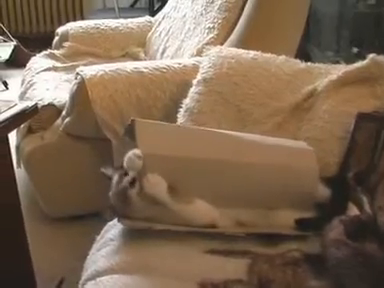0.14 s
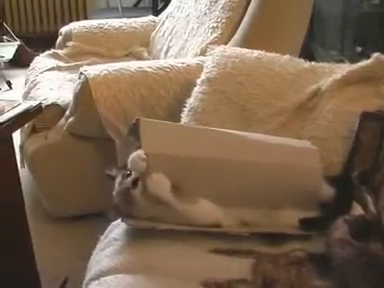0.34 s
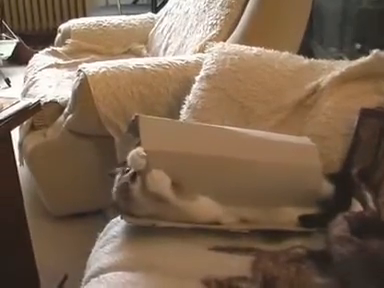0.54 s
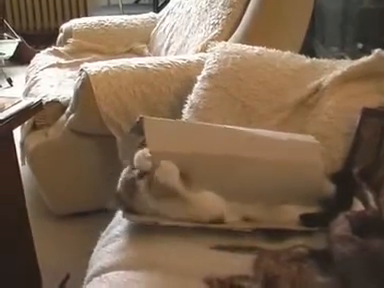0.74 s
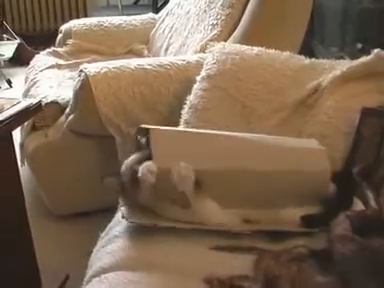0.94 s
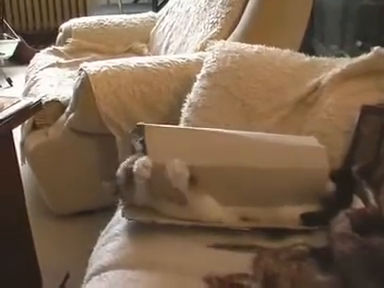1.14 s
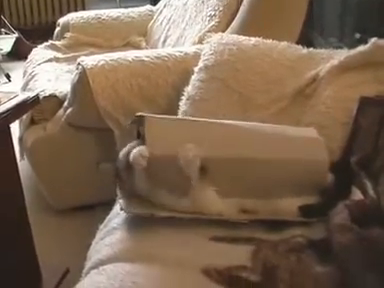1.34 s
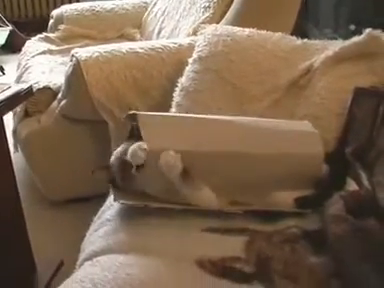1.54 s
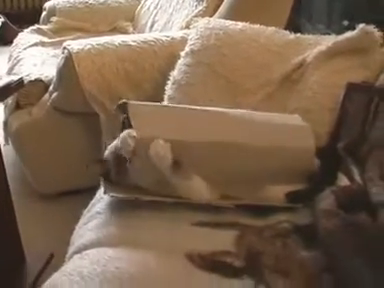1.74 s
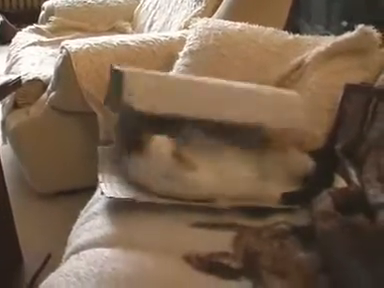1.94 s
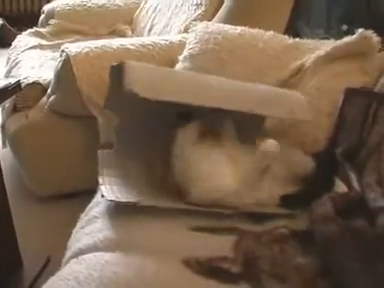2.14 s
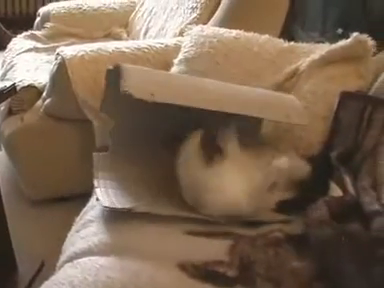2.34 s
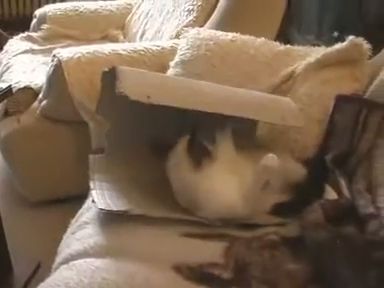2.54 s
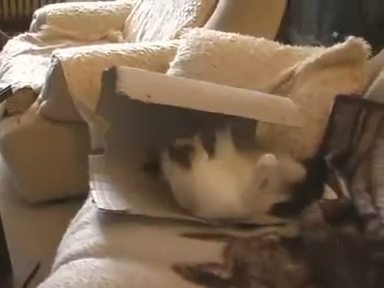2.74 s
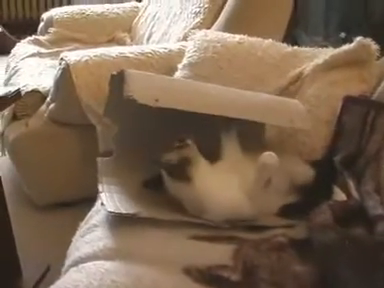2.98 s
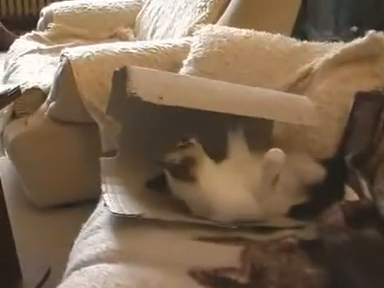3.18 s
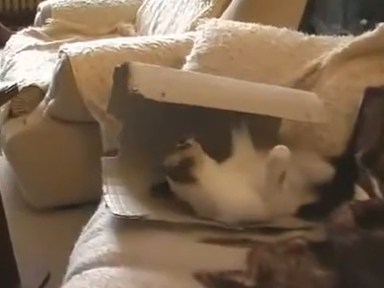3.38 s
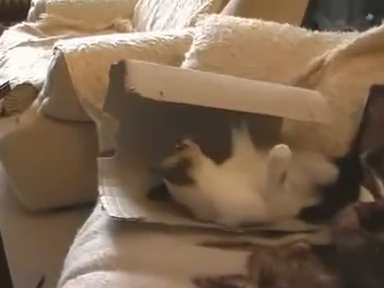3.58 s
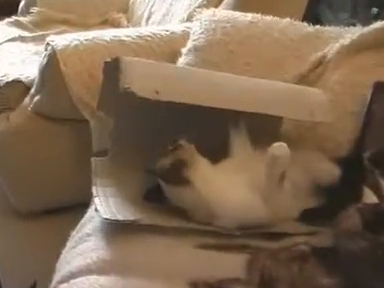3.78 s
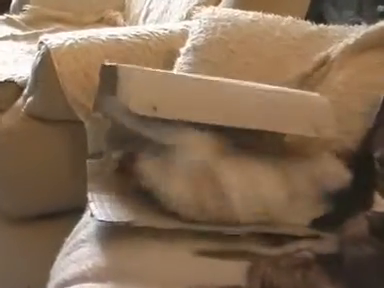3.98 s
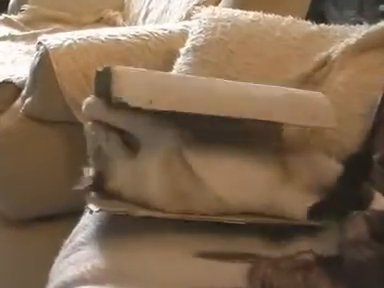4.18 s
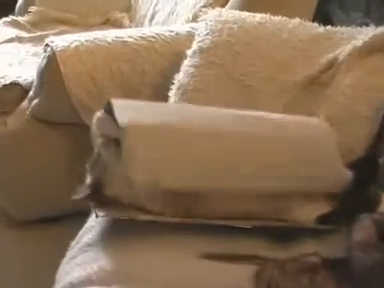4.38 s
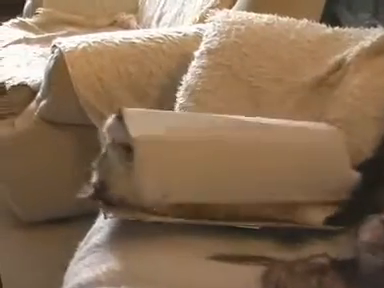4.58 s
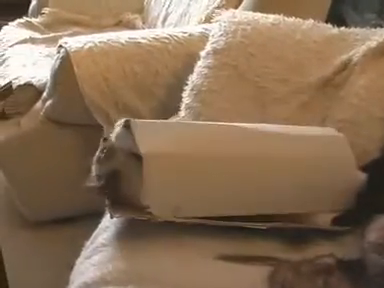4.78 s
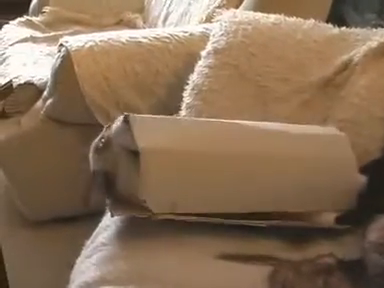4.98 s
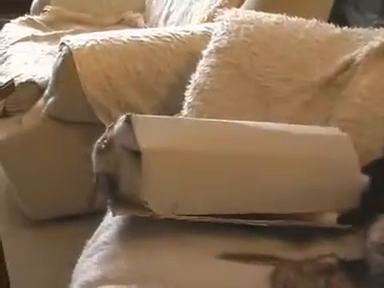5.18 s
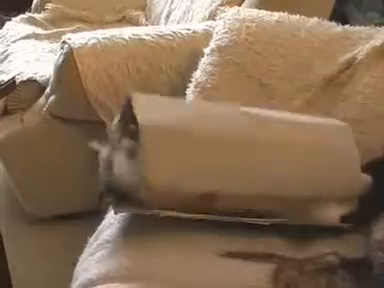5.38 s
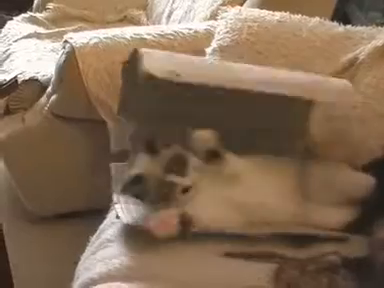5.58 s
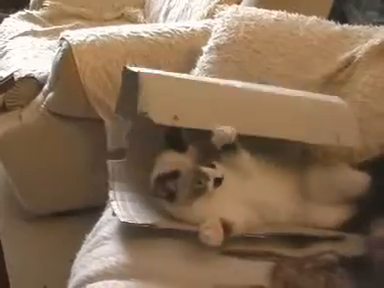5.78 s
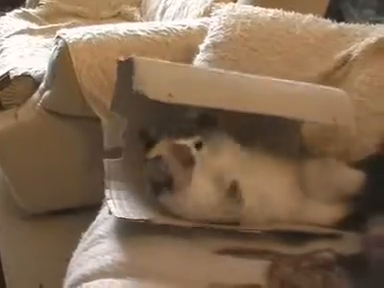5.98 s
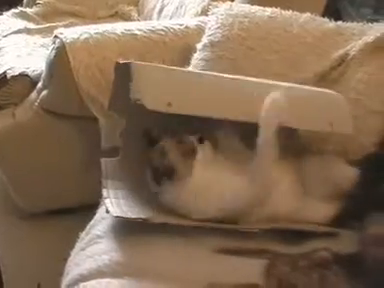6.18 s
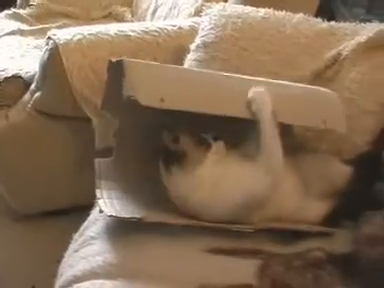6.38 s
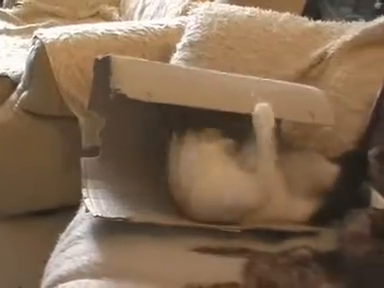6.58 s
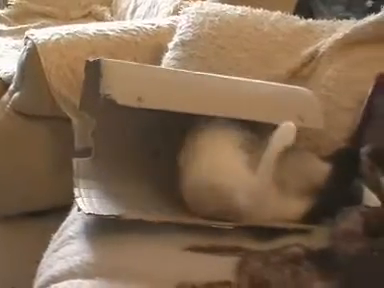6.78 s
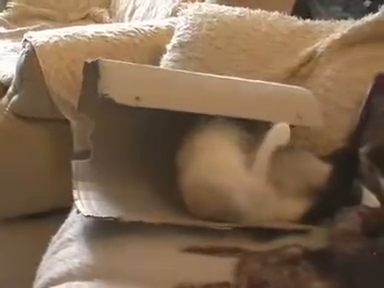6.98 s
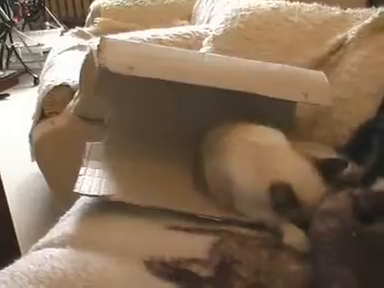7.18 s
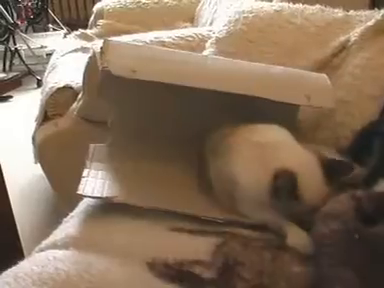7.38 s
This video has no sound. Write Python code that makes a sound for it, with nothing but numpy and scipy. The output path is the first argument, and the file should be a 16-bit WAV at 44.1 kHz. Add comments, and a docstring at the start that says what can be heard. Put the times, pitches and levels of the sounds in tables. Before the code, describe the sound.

Irregular cardboard scrapes, fur brushing and tiny claw snaps, heard fairly close and slightly right of centre in a small furnished living room. Early activity builds to a hard double crack and thump, then a snap; a quieter spell follows, with soft bumps and scuffs, one more boxy thwack, near silence, and thin dry scratches at the end. Low room air, hiss and faint motor hum continue underneath.

```python
"""Kitten in a cardboard box

A kitten rolls about in a cardboard box on a sofa: claws and fur scrape the card, claws snap free, the box knocks.
Scrapes are random stick-slip forces driving card filters; snaps are short noise bursts; knocks are damped modes.
Soft noise makes the sofa cloth, and decaying noise tails make a short furnished room.
Coloured noise and wavering sines lie under it all as room air, hiss and a faint motor and mains hum."""
import sys
import numpy as np
from scipy import signal
from scipy.fft import rfft, irfft, next_fast_len
from scipy.io import wavfile
from scipy.ndimage import map_coordinates

SR = 44100
rng = np.random.default_rng(int(sys.argv[2]) if len(sys.argv) > 2 else 0)


def master_out(mix):
    """Clip the mix to full scale and print it as 16-bit PCM to the path in sys.argv[1]."""
    frames = np.transpose(np.atleast_2d(mix))
    ceiling = np.clip(frames, -1, 1)
    pcm = np.round(ceiling * 32767).astype(np.int16)
    wavfile.write(sys.argv[1], SR, pcm)


N = 327125  # length in samples


def amp(db):
    """Decibels to gain."""
    return 10 ** (np.asarray(db) / 20)


def unit(x):
    """x at rms 1."""
    return x / np.sqrt(np.mean(x ** 2) + 1e-20)


def along(points, hz):
    """(Hz, value) points read on a log frequency axis."""
    f, v = np.transpose(points)
    return np.interp(np.log(hz + 1), np.log(f + 1), v)


def wobble(rate, size):
    """A smooth random curve, rate knots a second."""
    knots = rng.standard_normal(int(size * rate / SR) + 4)
    return map_coordinates(knots, [np.arange(size) * rate / SR])


def filtered(x, gain):
    """x times a gain that depends on frequency."""
    m = next_fast_len(N + SR // 2)
    spectrum = rfft(x, m) * gain(np.fft.rfftfreq(m, 1 / SR))
    return irfft(spectrum, m)[..., :N]


def ring(colour_db, size=4096):
    """Minimum-phase impulse response of energy 1 with the given colour, by folding the cepstrum."""
    magnitude = amp(colour_db(np.fft.rfftfreq(size, 1 / SR)))
    cepstrum = irfft(np.log(magnitude + 1e-6))
    cepstrum[1:size // 2] *= 2
    cepstrum[size // 2 + 1:] = 0
    h = irfft(np.exp(rfft(cepstrum)))
    return h / np.linalg.norm(h)


def hump_db(hz, centre, octaves, skirt_db):
    """A broad hump whose sides fall by skirt_db for every width further out."""
    widths_out = np.log2((hz + 1) / centre) / octaves
    return -skirt_db * (np.hypot(1, widths_out) - 1)


def add(track, s, sound):
    """Mix sound into track from time s."""
    start = round(s * SR)
    part = sound[max(-start, 0):N - start]
    track[max(start, 0):][:len(part)] += part


# colour of room air and hiss: f/Hz, relative level/dB per Hz
AIR_COLOUR = [(25, -21), (60, -13), (150, -3.5), (300, -14), (440, 2), (620, -10.5), (800, -8.5),
              (1150, -12.5), (1400, -9), (2000, -12), (2800, -12.5), (3500, -19.5), (6000, -17),
              (14500, -24.5)]
# how alike the air is in the two channels: f/Hz, correlation
AIR_LIKENESS = [(60, .3), (180, 0.051), (550, 0.05), (1650, 0.078), (5000, 0.14), (15000, 0.24)]
# motor and mains hum lines: f/Hz, level/dB rms before waver and trim
HUM_LINES = [(51, -80.5), (102, -81), (150.3, -74), (199.2, -77.5), (428, -76.5), (1378.3, -75.5),
             (2250, -80.5), (2550, -84), (2756, -84)]


def background(air_db=-64, waver_rad=0.56, waver_db=2.3, hum_trim_db=1.0):
    """Room air and microphone hiss as noise, with the wavering lines of a small motor and mains hum."""
    def turn(hz):
        return np.arccos(np.clip(along(AIR_LIKENESS, hz), -1, 1)) / 2

    def mid_side_gain(hz):
        return amp(along(AIR_COLOUR, hz)) * [np.cos(turn(hz)), np.sin(turn(hz))]

    mid, side = filtered(rng.standard_normal((2, N)), mid_side_gain)
    air = amp(air_db) * unit(np.array([mid + side, mid - side]))
    t = np.arange(N) / SR
    hum = np.zeros(N)
    for hz, db in HUM_LINES:
        level = amp(db + waver_db * wobble(11, N))
        hum += level * np.sin(2 * np.pi * hz * t + waver_rad * wobble(30, N))
    return air + np.sqrt(2) * amp(hum_trim_db) * hum  # sqrt(2): rms to peak


# length of the room's tail: f/Hz, t60/s
ROOM_T60 = [(100, 0.25), (500, 0.34), (2000, 0.32), (6000, 0.24), (14000, 0.29)]
# stereo spread of the tail: f/Hz, gain on the side signal
ROOM_SPREAD = [(100, 0.22), (500, 0.47), (1500, 0.67), (5000, 0.5), (14000, 1.4)]
# strength of the tail: f/Hz, level/dB re direct sound
ROOM_STRENGTH = [(100, -1), (250, -9.5), (500, -5.5), (1500, -9.5), (5000, -10), (14000, -13)]


def room(x, delay_s=0.00087, count=24):
    """A short diffuse tail, drawn anew for each equal stretch of time so that no single comb colours the whole."""
    out = np.zeros((2, N))
    edges = np.linspace(0, N, count + 1).astype(int)
    for start, end in zip(edges, edges[1:]):
        hz, t, z = signal.stft(rng.standard_normal((2, SR // 2)), SR, nperseg=256)
        decay = amp(-60 * t / along(ROOM_T60, hz)[:, None])
        tails = signal.istft(z * decay, SR, nperseg=256)[1]
        onset = 1 - np.exp(-(np.arange(tails.shape[1]) / SR / delay_s) ** 2)
        for track, tail in zip(out, tails * onset):
            add(track, start / SR, signal.fftconvolve(x[start:end], tail / np.linalg.norm(tail)))
    mid = out[0]
    side = filtered(out[1], lambda hz: along(ROOM_SPREAD, hz))
    return filtered(np.array([mid + side, mid - side]), lambda hz: amp(along(ROOM_STRENGTH, hz)))


# how hard the body rubs along the box: t/s, level/dB
WRIGGLE_LEVEL = [(0, -55), (.18, -57), (.36, -69.5), (.85, -53.5), (1.12, -71.5), (1.27, -55),
                 (1.55, -58.5), (1.72, -68), (2.1, -67), (2.55, -78.5), (3.1, -74), (3.8, -78),
                 (4.1, -64.5), (4.44, -61.5), (4.62, -72), (5.15, -71), (5.6, -65), (6.25, -72),
                 (7.42, -76)]


def wriggling():
    """Level of the body's rubbing at each sample, dB."""
    return np.interp(np.arange(N) / SR, *np.transpose(WRIGGLE_LEVEL))


# colour of the cloth's rustle: f/Hz, relative level/dB per Hz
CLOTH_COLOUR = [(25, -12), (55, -7), (100, 1), (220, -2), (480, -2), (800, -3.5), (1500, -19.5),
                (4000, -26)]


def cushion(mean_db=-67.5, follows=.35, lumps_db=0.5):
    """Fur and card drag softly over the sofa's cloth: noise that gains follows dB per dB of wriggling."""
    wriggle_db = wriggling()
    level_db = mean_db + follows * (wriggle_db - wriggle_db.mean())
    drag = unit(filtered(rng.standard_normal(N), lambda hz: amp(along(CLOTH_COLOUR, hz))))
    return drag * amp(level_db + lumps_db * wobble(14, N))


# resonances of the box: f/Hz, width/Hz, lift/dB before each sound's own weighting
BOX_MODES = [(103, 21, 5), (171, 17, 0), (234.7, 65, 6.5), (323, 34, 1), (396.4, 78, 5.5), (486, 140, 2.5),
             (582, 40, -1.5), (701, 135, 5), (843, 153, 5.5), (963, 23, 7), (1078, 177, 10),
             (1316, 120, 8.5), (1984, 150, 7), (2290, 1130, 10.5), (2950, 250, 7), (3740, 98, -4.5),
             (4500, 390, 6.5), (4870, 64, 9)]


def box_db(hz):
    """How much the box's resonances lift each frequency."""
    return sum(db / (1 + (2 * (hz - centre) / width) ** 2) for centre, width, db in BOX_MODES)


def slips(size, rate, scatter_db, smooth_db):
    """Stick-slip force: tiny releases of uneven size over a smooth rub."""
    hit = rng.random(size) < rate / SR
    spread_db = scatter_db * np.clip(rng.standard_normal(size), -2, 2)
    releases = hit * amp(spread_db) * rng.choice([-1, 1], size)
    return unit(unit(releases) + amp(smooth_db) * rng.standard_normal(size))


def reflected(x, strength=0.22, latest_s=.003, count=5):
    """x with copies from the box's near walls; they comb each sound differently."""
    walls = np.zeros(SR // 100)
    walls[0] = 1
    lags = (rng.uniform(.08, 1, count) * latest_s * SR).astype(int)
    walls[lags] += strength * rng.choice([-1, 1], count)
    return signal.fftconvolve(x, walls / np.linalg.norm(walls))


# colour of the walls flexing: f/Hz, relative level/dB per Hz
WALL_COLOUR = [(30, -42), (70, -19), (130, -5.5), (250, -0.5), (420, 0), (650, -2), (1200, -22.5),
               (3000, -59.5)]
# colour of the card's fibres catching: f/Hz, relative level/dB per Hz
FIBRE_COLOUR = [(1200, -51), (2800, 2), (3900, -2), (5000, 3.5), (8000, 1.5), (10500, 0.5), (13000, 0),
                (15500, -20)]
# what a card panel radiates: f/Hz, relative level/dB
PANEL_COLOUR = [(200, -2.5), (450, -7), (750, 4.5), (1500, 0), (2100, -1.5), (2600, 0.5), (3300, -5.5),
                (4500, -1), (7000, -20)]


def scrape(pressure, db, panel_hz, flex_db, grit_db, judder_db=2.5, lightness=.45):
    """Slips under a pressure drive the wall, the panel under the paw and the surface fibres."""
    size = len(pressure)
    flex = ring(lambda hz: along(WALL_COLOUR, hz) + 1.16 * box_db(hz))
    grit = ring(lambda hz: along(FIBRE_COLOUR, hz))
    panel = ring(lambda hz: hump_db(hz, panel_hz, octaves=0.73, skirt_db=12)
                 + along(PANEL_COLOUR, hz) + 0.76 * box_db(hz))
    # a light touch hardly bends the wall and slips in finer steps
    fine = amp(-lightness * flex_db)
    judder = amp(judder_db * wobble(190, size))
    force = pressure * judder * slips(size, rate=850 * fine, scatter_db=5.0, smooth_db=-8.5)
    # single fibres letting go
    catches = pressure * slips(size, rate=450 * fine, scatter_db=4.0, smooth_db=-1)
    out = np.zeros(size + SR // 8)
    for drive, part, part_db in (force, panel, 0), (force, flex, flex_db), (catches, grit, grit_db):
        sound = reflected(signal.fftconvolve(drive, part))
        level = amp(db + part_db) * np.linalg.norm(pressure) / np.linalg.norm(sound)
        out[:len(sound)] += level * sound
    return out


def fur(touch_db=-57, uneven_db=2):
    """The kitten's coat brushes the card in one long, light, uneven scrape."""
    pressure = amp(wriggling() - touch_db + uneven_db * wobble(12, N))
    return scrape(pressure, touch_db, panel_hz=1410, flex_db=-5, grit_db=-1.0)[:N]


# body and paws bumping the walls: t/s, level/dB, f/Hz
WALL_BUMPS = [(.068, -46, 180), (.092, -49.5, 526), (.272, -51.5, 178), (1.289, -33, 407),
              (1.404, -19, 370), (1.407, -22.5, 126), (1.419, -29.5, 385), (1.852, -26.5, 630),
              (1.977, -44.5, 430), (2.563, -55.5, 252), (2.578, -50, 100), (2.975, -55.5, 419),
              (3.934, -51, 115), (3.979, -45, 550), (4.054, -48, 130), (4.086, -36.5, 193),
              (4.106, -43, 200), (4.198, -45.5, 297), (4.363, -39.5, 355), (5.263, -42.5, 199),
              (5.348, -16.5, 960), (5.35, -20, 348), (5.411, -53, 380), (5.478, -52, 219)]


def knocks(attack_s=0.0018, octaves=.45, hard_db=-19, hard_t60_s=0.027, db_per_halving=21):
    """A bump rings the box's modes around its own pitch; harder ones are damped faster by cushion and fur."""
    out = np.zeros(N)
    t = np.arange(SR // 3) / SR
    hz, _, lift = np.transpose(BOX_MODES)
    for s, db, pitch_hz in WALL_BUMPS:
        t60 = hard_t60_s * 2 ** ((hard_db - db) / db_per_halving)
        uneven_db = 2 * rng.standard_normal(len(hz))
        weight = amp(lift + hump_db(hz, pitch_hz, octaves, skirt_db=7.5) + uneven_db)
        # the kitten's weight bends the walls and detunes them, here at random
        bent = hz * (1 + .03 * rng.standard_normal(len(hz)))
        modes = weight * rng.choice([-1, 1], len(hz)) @ np.sin(2 * np.pi * bent[:, None] * t)
        envelope = amp(-60 * t / t60) * (1 - np.exp(-t / attack_s))
        add(out, s, amp(db + 7) * modes / np.linalg.norm(weight) * envelope)
    return out


# claws and card edges snapping free: t/s, level/dB, f/Hz
CLAW_SNAPS = [(.07, -32.5, 4570), (.3175, -42, 11200), (0.4217, -42.5, 1100), (0.463, -39, 3100),
              (0.6623, -32, 6540), (.74, -40, 1080), (.784, -35.5, 890), (.8445, -35.5, 5460),
              (1.1076, -45.5, 1800), (1.149, -46.5, 11000), (1.2917, -30.5, 1700), (1.31, -27, 3000),
              (1.3681, -35, 1190), (1.4, -22.5, 2200), (1.4039, -15, 2470), (1.4058, -12, 2880),
              (1.423, -35, 2700), (1.45, -40, 3000), (1.8401, -26.5, 2900), (1.8515, -16.5, 4560),
              (1.9342, -31.5, 4220), (3.449, -50, 6000), (3.9757, -33.5, 3050), (4.087, -47, 1600),
              (4.5161, -46, 1500), (4.8626, -44.5, 1290), (5.2712, -40, 1090), (5.3484, -28, 12500),
              (5.407, -45, 9000), (6.344, -41, 2020), (6.7145, -32, 2390)]


def snaps(pitch_shortens=0.27, force_shortens=0.23):
    """A claw tears loose in milliseconds of breaking fibres; high and hard snaps are over soonest."""
    usual_db, usual_hz, usual_t60_s, rise_s = -35, 2000, 0.019, 0.00058
    # snaps are broadest at this pitch, how broad, and how far off they narrow
    crack_hz, crack_octaves, crack_reach_octaves = 3470, 1.27, 2.05
    out = np.zeros(N)
    t = np.arange(-SR // 80, SR // 20) / SR
    for s, db, pitch_hz in CLAW_SNAPS:
        t60 = usual_t60_s * (usual_hz / pitch_hz) ** pitch_shortens * amp(force_shortens * (usual_db - db))
        octaves = crack_octaves * np.exp(-(np.log2(pitch_hz / crack_hz) / crack_reach_octaves) ** 2)
        tear = np.exp(np.minimum(t, 0) / rise_s) * amp(-60 * np.maximum(t, 0) / t60)
        card = ring(lambda hz: hump_db(hz, pitch_hz, octaves, skirt_db=9.5) + .5 * box_db(hz))
        crack = signal.fftconvolve(tear * rng.standard_normal(len(t)), card)
        add(out, s + t[0], amp(db) * crack * np.linalg.norm(tear) / np.linalg.norm(crack))
    return out


# strokes on the card, by paws and, at 1.39, 1.853, 5.306 and 5.379 s, by the box sliding after it lands:
# nominal start t/s, nominal length/s, level/dB before the mix trim, # panel pitch f/Hz, wall flex level/dB re
# panel
CARD_STROKES = [(0, 0.033, -45, 1830, -7), (.05, 0.042, -48.5, 1590, 1), (0.407, .04, -48, 1170, 4),
                (0.441, 0.083, -59.5, 1190, 4.5), (.653, .022, -43.5, 1410, -8),
                (0.67, 0.068, -59, 1390, -8), (.711, 0.072, -42.5, 1050, -6.5),
                (.772, 0.089, -45.5, 1000, -1.5), (.887, 0.095, -40, 1430, -5),
                (.98, 0.057, -50.5, 1250, 0.5), (1.287, 0.039, -34.5, 1640, -7),
                (1.314, 0.021, -31.5, 1320, -23), (1.349, .07, -46, 1150, -16),
                (1.39, .13, -43.5, 1350, 1.5), (1.601, .22, -59, 1080, -4), (1.781, 0.042, -50, 1500, -6),
                (1.853, 0.039, -42, 884, -0.5), (1.932, 0.019, -40, 1670, -13),
                (2.161, 0.074, -51, 1920, -7), (2.267, 0.077, -55, 1150, 4.5), (2.313, 0.081, -49, 1230, 0),
                (2.818, 0.09, -51.5, 1460, -4), (4.073, 0.072, -49, 1430, -9.5),
                (4.189, .072, -46.5, 1750, -10), (4.331, .09, -57.5, 1200, -3),
                (4.456, .03, -54, 1170, -2.5), (4.503, 0.039, -46.5, 1110, -5.5),
                (4.654, .06, -55, 1070, -12), (4.764, .06, -42, 1300, -14), (4.839, 0.084, -52, 1180, -8),
                (4.913, 0.038, -48, 1050, -2.5), (4.938, 0.092, -45, 1060, -4.5),
                (5.214, 0.047, -52, 1050, -7), (5.256, .052, -32.5, 1020, -8.5),
                (5.306, 0.089, -44.5, 1100, -3.5), (5.379, 0.087, -47, 960, 2.5),
                (5.802, .1, -68, 1700, -7.5), (6.328, 0.11, -34.5, 1800, -25), (6.419, .2, -52, 1650, -11),
                (6.487, 0.047, -48.5, 1930, -14), (6.599, 0.096, -43, 1890, -22.5),
                (6.652, 0.086, -42, 1900, -26), (6.76, 0.034, -50.5, 1870, -14)]


def strokes(shape=1.85, catch_share=.42):
    """A stroke catches for catch_share of its length, drags and eases off; light, high strokes are the
    grittiest."""
    usual_db, usual_hz = -47, 1300
    # fibre noise re panel: in a usual stroke, its change with level, with pitch
    usual_grit_db, grit_db_per_db, grit_db_per_octave = -6, -0.37, 4.5
    out = np.zeros(N)
    for s, length, db, panel_hz, flex_db in CARD_STROKES:
        rise, fall = catch_share * length, (1 - catch_share) * length
        t = np.arange(-round(.85 * rise * SR), round(1.3 * fall * SR)) / SR  # 0 at the firmest press
        pressure = np.exp(-2 * np.abs(np.where(t < 0, t / rise, t / fall)) ** shape)
        grit_db = usual_grit_db + grit_db_per_db * (db - usual_db)
        grit_db += grit_db_per_octave * np.log2(panel_hz / usual_hz)
        add(out, s + rise + t[0], scrape(pressure, db, panel_hz, flex_db, grit_db))
    return out


# lean of the box and its room sound to the right: f/Hz, right over left level/dB
RIGHT_LEAN = [(60, 6), (250, 5), (600, 2.5), (1100, 1.5), (2000, 0.2), (4000, 0.1), (8000, 1.5),
              (12000, 2.5)]


def scene(low_cut_hz=63, stroke_trim_db=-0.46):
    """The box sits slightly right of centre; a microphone low cut thins the deep bass of the box sounds."""
    box = amp(stroke_trim_db) * strokes() + fur() + snaps() + knocks()
    low_cut = signal.butter(3, low_cut_hz, "high", fs=SR, output="sos")
    box = signal.sosfilt(low_cut, box) + cushion()
    heard = filtered(box + room(box), lambda hz: amp(np.outer([-.5, .5], along(RIGHT_LEAN, hz))))
    return heard + background()


def record(dry, top_hz=14600):
    """A very steep low-pass removes nearly everything above the band limit."""
    return filtered(dry, lambda hz: 1 / np.sqrt(1 + (hz / top_hz) ** 160))


dry = scene()
out = record(dry)
master_out(out)
```